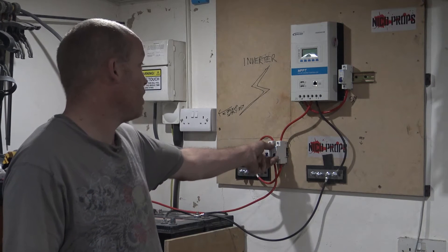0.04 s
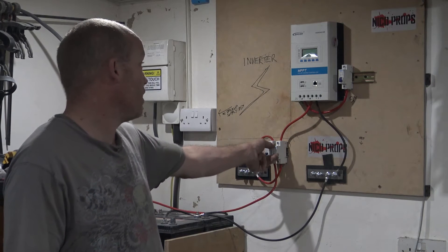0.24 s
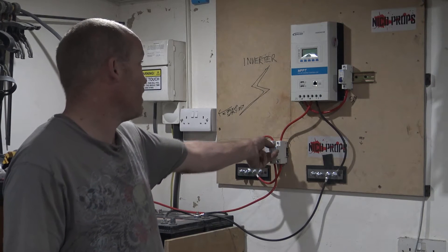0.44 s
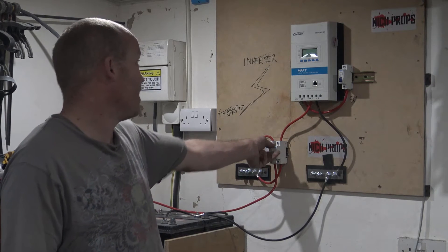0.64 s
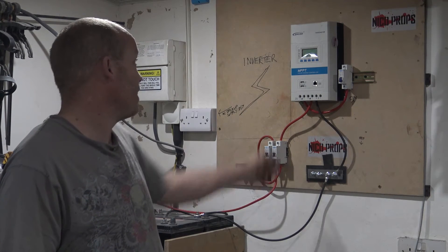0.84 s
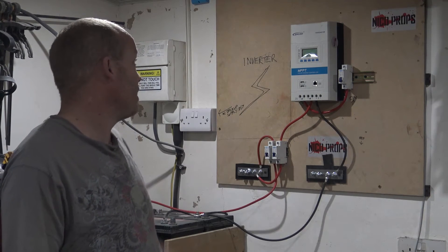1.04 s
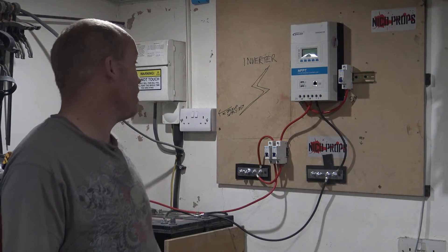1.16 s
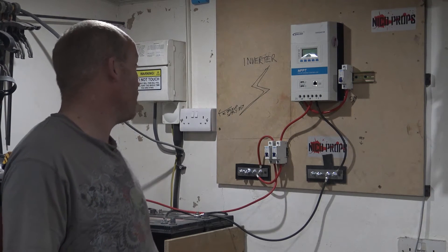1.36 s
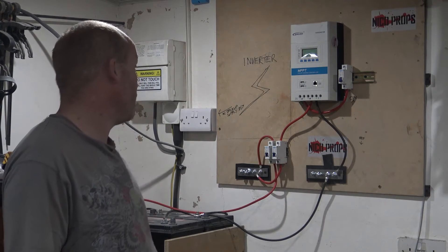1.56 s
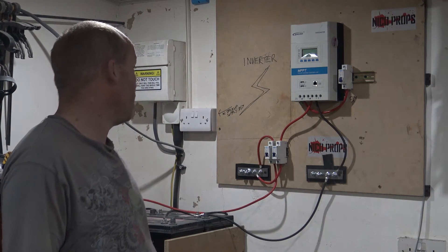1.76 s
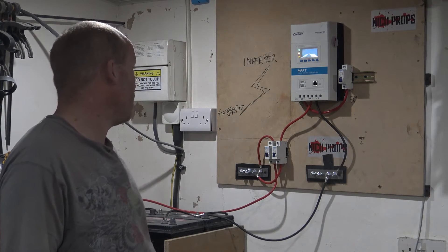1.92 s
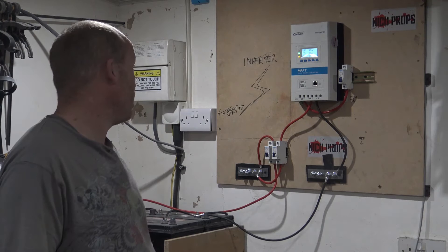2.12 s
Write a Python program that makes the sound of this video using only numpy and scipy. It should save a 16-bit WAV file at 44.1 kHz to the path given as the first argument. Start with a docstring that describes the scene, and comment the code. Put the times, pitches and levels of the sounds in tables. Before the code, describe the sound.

Close to the microphone in a small, slightly echoing workshop, fingertips rub on a plastic breaker switch and its lever ticks lightly. Then comes the loudest sound, a single crisp snap, with a low knock from the wooden panel behind it. After a short pause there is one soft brush of clothing and a little faint rustling. A quiet, steady airy whirr and hiss lie underneath.

```python
"""A hand works the lever of a small DC breaker on a wooden wall board in a bare workshop.
From 0.17 s the plastic lever ticks as it takes up its play. At 0.5 s the spring trips, the contacts
snap shut and bounce, and the board thumps. The hand lets go; at 1.3 s the arm drops with a swish
of cloth, then settles. A faint fan-like whirr and hiss run throughout."""
import sys
import numpy as np
from scipy import signal
from scipy.fft import rfft, irfft
from scipy.io import wavfile
from scipy.ndimage import uniform_filter1d

SR = 44100
rng = np.random.default_rng(int(sys.argv[2]) if len(sys.argv) > 2 else 0)


def wav_record(signal):
    """Record a signal, one row per channel, as 16-bit PCM in the file named by sys.argv[1]."""
    frames = np.transpose(np.atleast_2d(signal))
    bounded = np.clip(frames, -1, 1)
    # unit amplitude maps onto the largest positive 16-bit level
    quanta = np.round(bounded * 32767).astype(np.int16)
    wavfile.write(sys.argv[1], SR, quanta)


N = 96490

# spring trip, then slam and bounces: (time [s], relative level [dB], tilt [dB/octave], t60 [s])
SNAP_HITS = [(0.501, -48.5, -3.5, .02), (0.5049, -36, -1, 0.0047), (0.5057, -34, -1, 0.0029),
             (0.5065, -33.5, 0, 0.0377)]
SLAM_S = SNAP_HITS[1][0]
# plastic contact spectrum: (frequency [Hz], level [dB])
PLASTIC_SPECTRUM = [(100, -23), (400, -7.5), (1300, -4), (2000, -8.5), (3100, -1.5), (3800, 0), (5200, 1.5),
                    (5900, -5.5), (6500, -1.5), (7800, -7), (8800, -8), (11500, -9), (13500, -16),
                    (16000, -25)]
# dull board knock spectrum: (frequency [Hz], level [dB])
KNOCK_SPECTRUM = [(30, -20.5), (120, -0.5), (250, -4), (480, 1), (700, -16), (2000, -38.5), (8000, -32)]


def snap(trim_db=-5, crack_db=-33):
    """Contacts slam and bounce; the crack of the latch beams ahead and stays nearly dry."""
    # contact spectrum: (frequency [Hz], level [dB])
    spectrum = [(200, -9.5), (600, -6.5), (950, -8), (1250, -3.5), (1900, -2), (2200, -4), (3100, 0.5),
                (4200, 0), (5200, 2), (5800, -3.5), (6500, -3), (8100, -4.5), (9300, -7), (11600, -9.5),
                (13200, -17.5), (16000, -31)]
    # latch and its stiff frame: (frequency [Hz], level [dB], t60 [s])
    latch_modes = [(1236, -15, 0.0075), (1840, -18, 0.016), (3220, -23, 0.0029), (4820, -10, 0.0036),
                   (6490, -2.5, 0.005), (8030, 2, 0.0027), (11300, -2.5, 0.0027), (14100, -16, .004)]
    out = np.zeros(N)
    for start_s, db, tilt_db_oct, t60_s in SNAP_HITS:
        hit = contact(spectrum, tilt_db_oct, t60_s)
        add(out, start_s, amp(db + trim_db) * room(hit, wet_db=6.5, early_db=2))
    crack = ring(latch_modes, rise_s=0.00032)
    add(out, SLAM_S, amp(crack_db) * room(crack, wet_db=-11, early_db=-6))
    return out


def board(ring_db=-30, knock_db=-38):
    """The slam shakes the board: a dull knock and a low ring that swells over a few cycles."""
    # wooden board: (frequency [Hz], level [dB], t60 [s])
    board_modes = [(36, -10, 0.25), (67, -18, 0.41), (91.2, -7.5, 0.22), (150.9, -7, 0.37),
                   (235.6, 2.5, 0.16), (315.3, 0.5, 0.23), (415, 7, 0.16), (452, 7, 0.12), (594, -10, 0.1),
                   (828, -9.5, 0.21)]
    knock, ringing = np.zeros((2, N))
    add(knock, SLAM_S, amp(knock_db) * contact(KNOCK_SPECTRUM, tilt_db_oct=0, t60_s=0.045))
    add(ringing, SLAM_S, amp(ring_db) * ring(board_modes, rise_s=0.014))
    return ringing + room(knock, wet_db=-0.5, early_db=3)


def lever(knock_re_ring_db=-16):
    """Each click is a brief rough contact that rings the case and knocks the board."""
    # lever clicks: (time [s], level [dB], tilt [dB/octave], ring re click [dB],
    # ring tilt [dB/octave], contact t60 [s])
    clicks = [(0.174, -60, -3, -1.5, -2, 0.075), (0.192, -57.5, 0.5, 1.5, -10, 0.0075),
              (0.2048, -52, -2.5, -1, -7, 0.016), (0.2075, -47, 0, 2.5, -0.5, 0.0028),
              (0.3340, -43, -0.4, -6, 1.5, 0.0076)]
    # plastic case: (frequency [Hz], level [dB], t60 [s])
    case_modes = [(2434, -1.5, 0.0098), (2940, -7.5, 0.012), (3520, 3, 0.011), (3815, -3, 0.016),
                  (4030, 1, 0.012), (4670, -5, .012), (5200, -3, 0.0077), (9550, -5, 0.012)]
    lowest_hz = case_modes[0][0]
    out = np.zeros(N)
    for start_s, db, tilt_db_oct, ring_db, ring_tilt_db_oct, contact_s in clicks:
        click = contact(PLASTIC_SPECTRUM, tilt_db_oct, contact_s)
        add(out, start_s, amp(db) * room(click, wet_db=1.5, early_db=1.5))
        tilted_modes = [(hz, mode_db + ring_tilt_db_oct * np.log2(hz / lowest_hz), t60_s)
                        for hz, mode_db, t60_s in case_modes]
        ringing = ring(tilted_modes, rise_s=0.00038)
        add(out, start_s, amp(db + ring_db) * room(ringing, wet_db=1, early_db=1))
        knock = contact(KNOCK_SPECTRUM, tilt_db_oct=0, t60_s=0.062)
        add(out, start_s, amp(db + ring_db + knock_re_ring_db) * room(knock, wet_db=2, early_db=2))
    return out


def handling(friction_db=-4, scuff_db=-74.5, rumble_db=-70):
    """Shirt, sleeve and fingertips rub; the weight of the hand makes the board rumble."""
    # movements: (start [s], hold [s], relative level [dB])
    shirt_brushes = [(1.303, 0.019, -49), (1.98, 0.018, -69.5)]
    sleeve_moves = [(0.0, 0.049, -65.5), (.65, 0.38, -70), (1.16, .1, -63), (1.55, 0.26, -73.5)]
    finger_slides = [(.235, 0.012, -62.5), (.475, .04, -63.5), (.712, 0.014, -60.5)]
    hand_pushes = [(.085, 0.021, -63.5), (.225, 0.047, -59.5), (.375, 0.046, -59), (.725, 0.031, -62.5)]
    # friction spectra: (frequency [Hz], level [dB])
    shirt_spectrum = [(50, -9), (150, -0.5), (550, 1), (1400, 2.5), (2600, -3.5), (5000, -5.5), (8300, -9),
                      (11500, -13), (16000, -21)]
    sleeve_spectrum = [(40, -3), (150, -1), (600, -7), (1700, -5.5), (3000, -9.5), (6000, -33),
                       (16000, -28)]
    rumble_spectrum = [(20, -2.5), (50, 0), (80, 5.5), (105, 3), (140, -14.5), (450, -17), (700, -32),
                       (4000, -60)]
    shirt = rub(strokes(shirt_brushes, attack_s=0.016, release_s=0.03), shirt_spectrum, grain_db=0.5)
    sleeve = rub(strokes(sleeve_moves, attack_s=0.095, release_s=0.15), sleeve_spectrum, grain_db=2.5)
    grip = strokes([(0.018, 0.77, 0)], attack_s=0.055, release_s=0.14)  # hand rests on the breaker
    sliding = strokes(finger_slides, attack_s=0.019, release_s=0.024)
    pushing = strokes(hand_pushes, attack_s=0.015, release_s=0.019)
    fingers = rub(np.hypot(amp(scuff_db) * grip, sliding), PLASTIC_SPECTRUM, grain_db=0)
    rumble = rub(np.hypot(amp(rumble_db) * grip, pushing), rumble_spectrum, grain_db=0)
    return amp(friction_db) * room(shirt + sleeve + fingers, wet_db=-3.5, early_db=-27) + rumble


def contact(spectrum, tilt_db_oct, t60_s):
    """Two rough faces meet: one impact spread into a burst."""
    return unit_blow(signal.fftconvolve(impact(spectrum, tilt_db_oct), chatter(t60_s)))


def impact(spectrum, tilt_db_oct, size=2048):
    """One short impact, made brighter or duller above 1 kHz by the given tilt."""
    hz = abs(np.fft.fftfreq(size, 1 / SR))
    octaves = np.log2(np.maximum(hz, 1000) / 1000)
    log_gain = np.log(amp(curve_at(spectrum, hz) + tilt_db_oct * octaves))
    minimum_phase = np.exp(np.conj(signal.hilbert(log_gain)))
    return unit_blow(np.fft.ifft(minimum_phase).real[:size // 2])


def chatter(t60_s, size=4096, passes=12):
    """A dying burst of tiny impacts that favours no pitch."""
    fade = amp(-60 * np.arange(size) / SR / t60_s)
    burst = rng.standard_normal(size) * fade
    for _ in range(passes):  # flatten the spectrum, restore the decay
        bins = rfft(burst)
        burst = irfft(bins / (abs(bins) + 1e-9)) * fade ** 0.125
    return burst / np.linalg.norm(burst)


def ring(modes, rise_s):
    """Damped modes of alternating sign that take a moment to build."""
    t = np.arange(SR) / SR
    tones = sum((-1) ** k * amp(db - 60 * t / t60_s) * np.sin(2 * np.pi * hz * t)
                for k, (hz, db, t60_s) in enumerate(modes))
    return unit_blow(tones * (1 - np.exp(-t / rise_s)))


def rub(envelope, spectrum, grain_db):
    """Friction: dense tiny slips; grain_db makes their size uneven."""
    slips = rng.standard_normal(N)
    grain = unit_rms(uniform_filter1d(rng.standard_normal(N), size=60))
    return unit_rms(shaped(slips * amp(grain_db * grain), spectrum)) * envelope


def strokes(moves, attack_s, release_s):
    """Envelope of movements that swell, hold and fade, summed in power."""
    t = np.arange(N) / SR
    power = np.zeros(N)
    for start_s, hold_s, db in moves:
        before = np.maximum(start_s - t, 0) / attack_s
        after = np.maximum(t - start_s - hold_s, 0) / release_s
        power += (amp(db) * np.exp(-before - after)) ** 2
    return np.sqrt(power)


def room(x, wet_db, early_db, build_s=0.00043):
    """Direct sound, near wall reflections and a dense tail whose bass lasts longest."""
    # room decay: (frequency [Hz], t60 [s])
    decay = [(100, 0.69), (400, 0.53), (1000, 0.41), (2800, 0.3), (5000, 0.3353), (8000, 0.2864),
             (12000, 0.24), (16000, 0.46)]
    # first reflections: (delay [s], relative level [dB])
    reflections = [(.0039, -11.5), (.0071, -11.5), (0.0133, -10), (.0224, -13.5), (.0243, -12.5)]
    hz, t, bins = signal.stft(rng.standard_normal(SR), SR, nperseg=256)
    bins = bins / (abs(bins) + 1e-12) * amp(-60 * t / curve_at(decay, hz)[:, None])
    tail = signal.istft(bins, SR, nperseg=256)[1]
    tail *= 1 - np.exp(-np.arange(len(tail)) / SR / build_s)
    response = amp(wet_db) * tail / np.linalg.norm(tail)
    response[0] += 1
    for delay_s, db in reflections:
        response[round(delay_s * SR)] += amp(db + early_db)
    return signal.fftconvolve(x, response)[:N]


def background(floor_db=-63.5):
    """Steady rumble and hiss, with an airy whirr of noise in narrow resonances."""
    # rumble and hiss: (frequency [Hz], level [dB])
    floor_spectrum = [(20, -9), (40, -2), (90, 0.5), (230, -2), (320, -5), (650, -2), (800, -5.5),
                      (1400, -9.5), (2100, -10), (3200, -14), (8000, -14.5), (15500, -17.5)]
    # whirr resonances: (centre [Hz], width [Hz], rms level [dB])
    whirr_bands = [(1010, 152, -68.5), (1149, 146, -69.5), (1840, 35, -80)]
    hz = np.fft.rfftfreq(N, 1 / SR)
    out = amp(floor_db) * unit_rms(shaped(rng.standard_normal(N), floor_spectrum))
    for centre_hz, width_hz, db in whirr_bands:
        resonance = 1 / (1 + (2 * (hz - centre_hz) / width_hz) ** 2)
        out += amp(db) * unit_rms(irfft(rfft(rng.standard_normal(N)) * resonance, N))
    return out


def amp(db):
    return 10 ** (np.asarray(db) / 20)


def unit_rms(x):
    return x / np.sqrt(np.mean(x ** 2) + 1e-20)


def unit_blow(x):
    """Scale to the energy of 10 ms at full level."""
    return x / np.linalg.norm(x) * np.sqrt(SR / 100)


def curve_at(points, hz):
    """Interpolate over log frequency."""
    points_hz, values = np.transpose(points)
    return np.interp(np.log(hz + 1), np.log(points_hz), values)


def shaped(x, spectrum):
    """Filter a full-length signal by a spectrum."""
    return irfft(rfft(x) * amp(curve_at(spectrum, np.fft.rfftfreq(N, 1 / SR))), N)


def add(mix, start_s, sound):
    part = mix[max(round(start_s * SR), 0):][:len(sound)]
    part += sound[:len(part)]


def scene():
    """Two close microphones hear nearly the same; scattered sound gives the width."""
    # stereo width of breaker and hand, and of background: (frequency [Hz], relative side level [dB])
    near_width = [(60, -42), (110, -21), (200, -18), (380, -14), (700, -10), (1290, -18), (2380, -51),
                  (4400, -24), (8120, -7), (15000, -32)]
    air_width = [(60, -9.5), (110, -10.5), (200, -6), (380, -6), (700, -11.5), (1290, -10), (2380, -19.5),
                 (4400, -14.5), (8120, -0.5), (15000, -21.5)]
    near = lever() + snap() + board() + handling()
    scattered = signal.fftconvolve(near, chatter(t60_s=0.014))[:N]
    mid = near + background()
    side = amp(-5) * shaped(scattered, near_width) + shaped(background(), air_width)
    return np.array([mid + side, mid - side])


def record(dry):
    """Steep low-pass band limit."""
    cutoff_hz = 15900
    lowpass = signal.firwin(511, cutoff_hz, window=("kaiser", 9), fs=SR)
    return signal.oaconvolve(dry, lowpass[None], "same")


dry = scene()
out = record(dry)
wav_record(out)
```